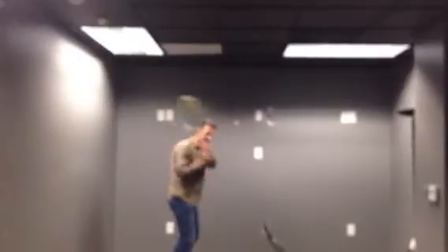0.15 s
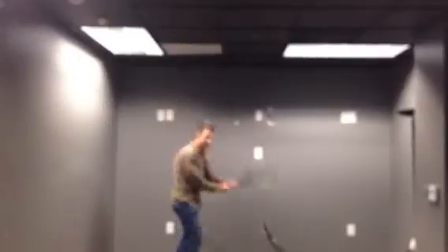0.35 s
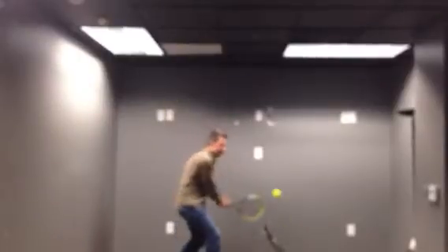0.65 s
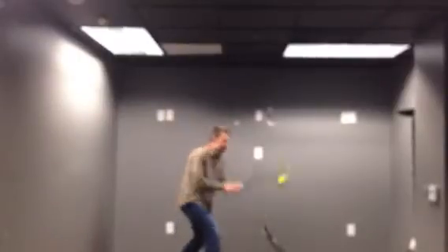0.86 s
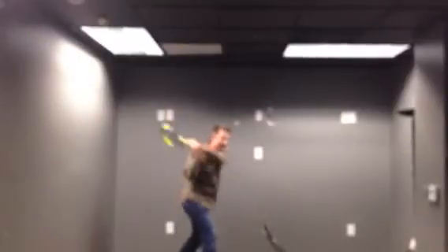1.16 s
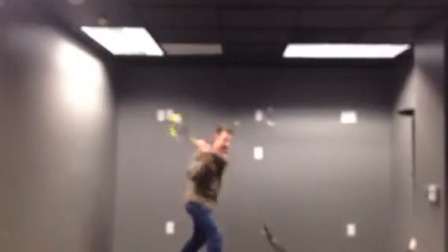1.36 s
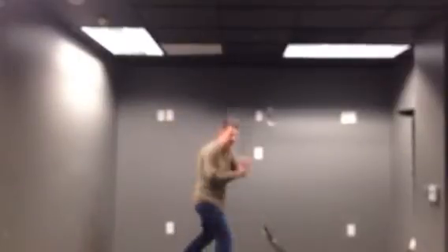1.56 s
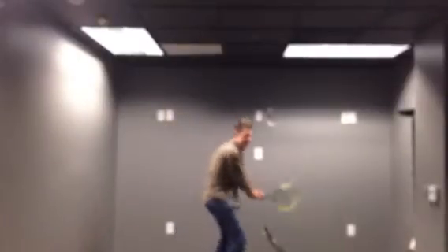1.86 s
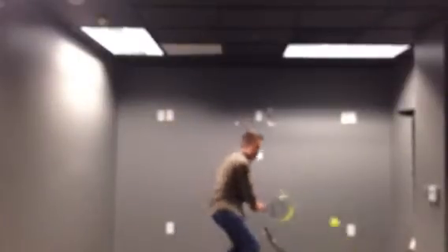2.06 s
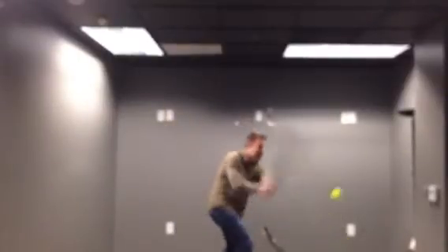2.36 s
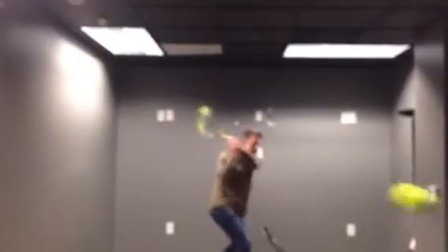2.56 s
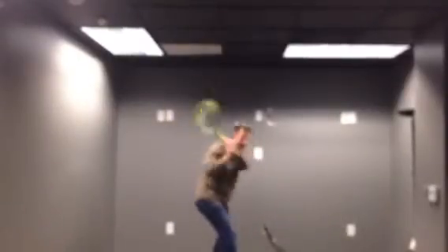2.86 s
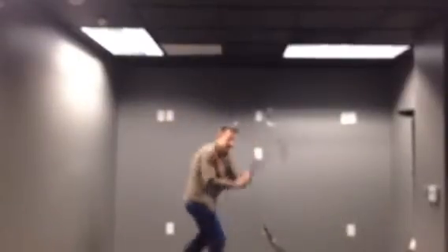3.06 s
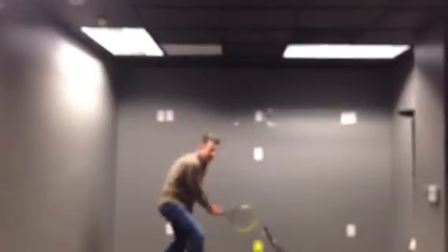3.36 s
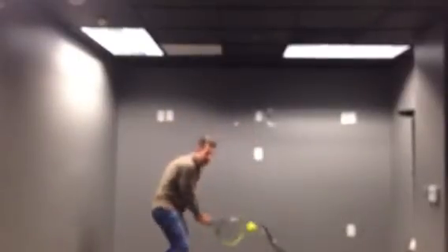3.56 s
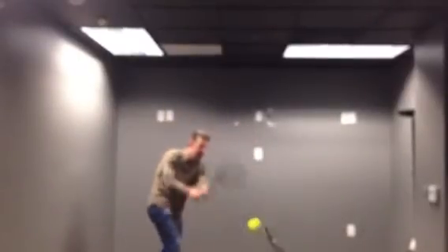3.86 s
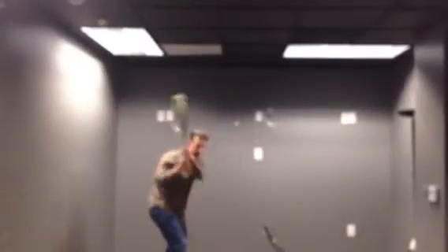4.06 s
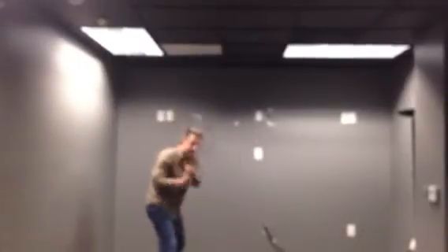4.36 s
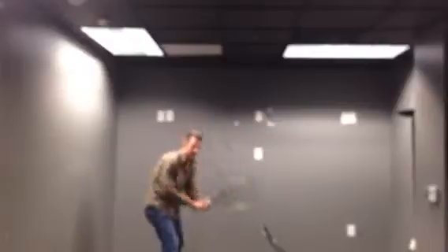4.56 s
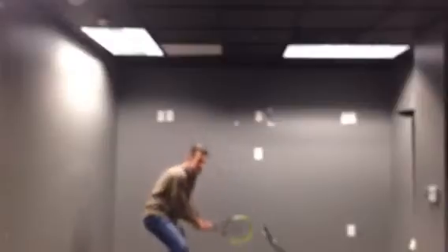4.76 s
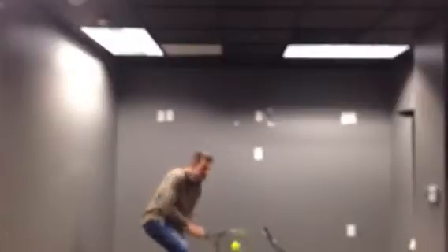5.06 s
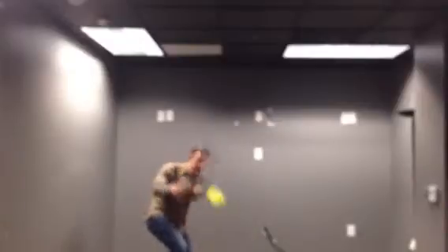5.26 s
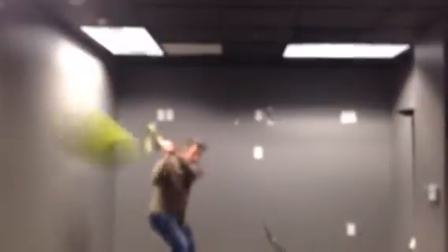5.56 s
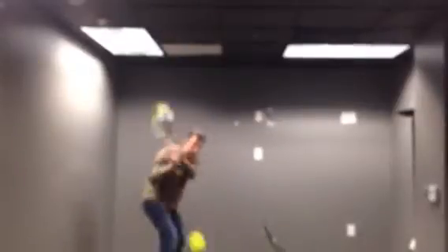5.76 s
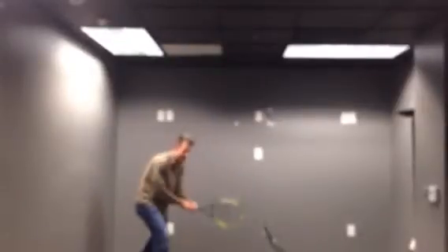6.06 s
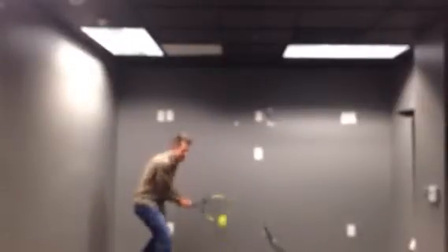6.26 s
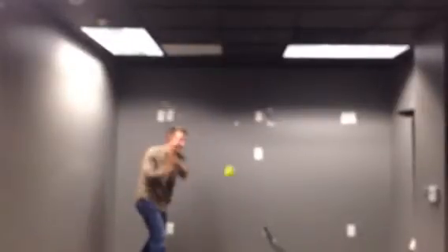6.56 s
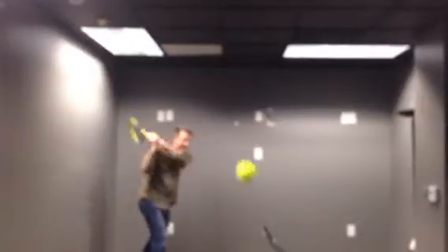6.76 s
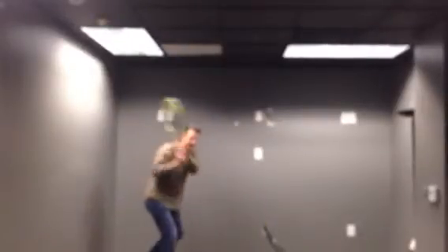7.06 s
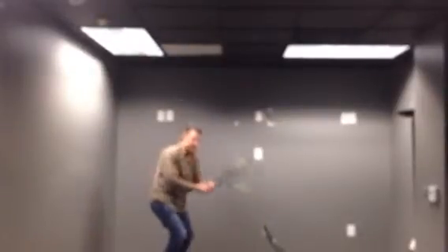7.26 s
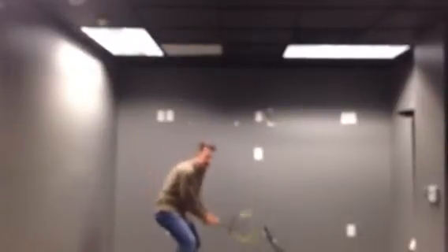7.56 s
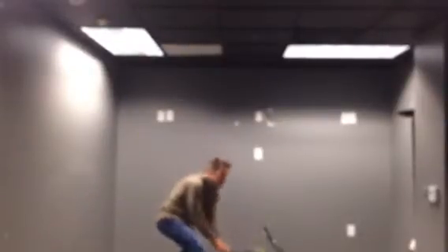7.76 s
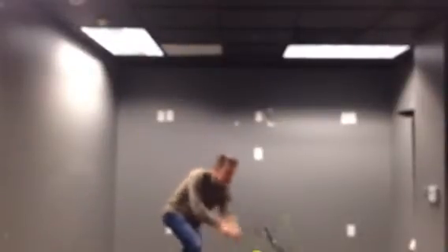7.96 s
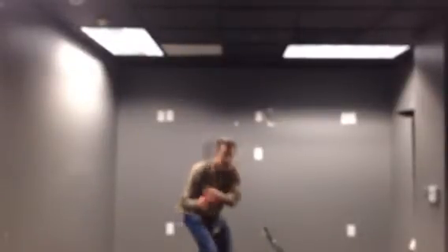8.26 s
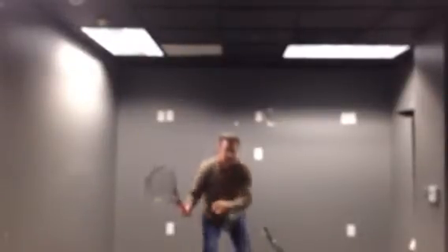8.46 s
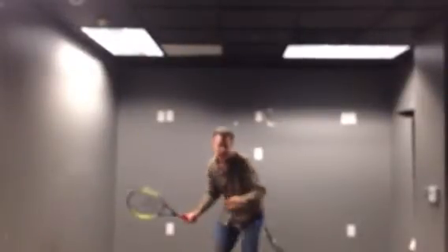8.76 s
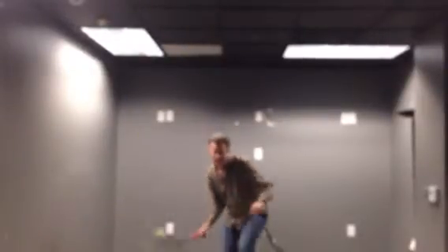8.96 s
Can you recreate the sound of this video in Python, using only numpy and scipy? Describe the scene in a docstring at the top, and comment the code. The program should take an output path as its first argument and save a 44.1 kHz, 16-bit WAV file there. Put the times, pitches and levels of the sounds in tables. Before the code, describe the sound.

One player hits a tennis ball against a hollow wall. Every 1.4 seconds or so a hard, booming slap dominates, followed by a muted floor thud and a woody racket knock with a short string ring. Echoes blur everything in the small room. Faint footsteps, sole scuffs, steady hum and hiss sit underneath, pumped by the distant microphone's gain control.

```python
"""The boom and echoes of a wall hit open the scene in a small bare room, over fan hum and hiss that never stop.
Then a tennis ball goes round: a dull hollow floor bounce, a racket knock with ringing strings, a wall slap.
Each contact is a short shaped pulse plus decaying noise echoes; decaying sines ring the wall, strings and ball.
Between them shoes thud as grainy bursts with room echoes and scuff as swelling noise.
The recorder's gain control ducks everything under the wall hits, then lets it rise again."""
import sys
import numpy as np
from scipy import signal
from scipy.fft import rfft, irfft
from scipy.io import wavfile

SR = 44100
rng = np.random.default_rng(int(sys.argv[2]) if len(sys.argv) > 2 else 0)


def wav_out(sig):
    """Save sig, one row per channel (or a flat mono array), as 16-bit PCM at SR to the path in sys.argv[1]."""
    wavfile.write(sys.argv[1], SR, np.round(np.clip(np.atleast_2d(sig).T, -1, 1) * 32767).astype(np.int16))


N = 402633
LEAD = 4410  # samples rendered ahead of the opening, so an earlier hit can ring into it
SPAN = 32768  # samples in an echo tail
RING_SIZE = 3 * SPAN // 2  # samples in a ring

# Levels are mix levels ahead of the recorder; spectra give relative density.
# Ball on wall, the first just before the opening: (time [s], slap [dB], panel boom [dB], deep boom [dB],
# note of the struck bay [Hz], bay level [dB], room note level [dB])
WALL_HITS = [(-0.077, -6, -11.5, -15.5, 166, -7, -34), (1.415, -5, -7, -8.5, 165.7, -9, -35),
             (2.813, -7, -13, -14, 109, -4.5, -35.5), (4.274, -4, -3, -10.5, 151, -4.5, -20.5),
             (5.604, -4, -21, -20.5, 159.8, -12.5, -43.5), (7.071, -5, -7, -10, 150.3, -5, -24),
             (8.458, -6.5, -0.5, -16, 152.3, 1, -35)]
# Ball on strings: (time [s], knock level [dB], string ring relative to knock [dB])
RACKET_STROKES = [(0.933, -27.5, -10.5), (2.347, -25.5, -12.5), (3.819, -23, -13.5), (5.207, -27, -16.5),
                  (6.511, -30, -9), (7.955, -24.5, -13.5)]
# Ball on floor: (time [s], level [dB])
FLOOR_BOUNCES = [(0.392, -23), (1.825, -21.5), (3.196, -24), (4.666, -20.5), (6.13, -24), (7.41, -23),
                 (8.824, -18)]
# Footfalls: (time [s], level [dB], brightness tilt [dB/octave])
FOOTFALLS = [(0.266, -46, 6), (0.731, -48.5, -4.5), (1.932, -48, -9), (2.034, -41, -6), (2.083, -53, -11),
             (3.626, -42.5, 0), (3.729, -47, 4.5), (7.306, -36, -6.5), (7.368, -35, -7.5)]
# Soles and cloth sliding: (time of the middle [s], level [dB], half length [s])
SCUFF_TIMES = [(3.004, -57.5, 0.069), (3.263, -67, 0.017), (5.892, -55, 0.096), (6.289, -60.5, 0.023),
               (7.333, -55.5, 0.05), (8.288, -62, 0.16), (8.579, -50, 0.048), (8.873, -50.5, 0.039)]

# Colour of the slap on the wall: (frequency [Hz], density [dB/Hz])
WALL_PUSH_COLOUR = [(18, -45), (30, -15.5), (225, 10), (1170, -24.5), (1640, -21.5), (2490, -19.5),
                    (3320, -12.5), (4910, -32.5), (5740, -48.5), (7260, -64.5), (8500, -68.5),
                    (15500, -57.5)]
# What the hard walls give back of a wall hit: (frequency [Hz], density [dB/Hz])
WALL_ECHO_COLOUR = [(180, -34), (300, -2), (417, -3), (769, -17), (1120, -11.5), (1810, -10), (2140, -13),
                    (2690, -22.5), (3280, -26), (7370, -45), (15500, -60)]
# Push of the whole wall on the air, heard as lumpy low echoes: (frequency [Hz], density [dB/Hz])
HEAVE_COLOUR = [(15, -17.5), (35, -6.5), (90, -3.5), (170, -1.5), (260, -12), (500, -29), (2000, -62)]
# Colour of the racket knock: (frequency [Hz], density [dB/Hz])
RACKET_PUSH_COLOUR = [(35, -60), (60, -16.5), (171, -1), (305, -3.5), (443, -14), (850, -13.5),
                      (1100, -7.5), (1790, -13.5), (2910, -26), (4630, -30), (10500, -37), (12500, -47),
                      (15500, -50.5)]
# Colour of the floor bounce: (frequency [Hz], density [dB/Hz])
BOUNCE_PUSH_COLOUR = [(35, -97), (60, -13.5), (107, -11), (183, 2.5), (253, -4), (312, 6.5), (486, 2.5),
                      (1960, -18.5), (2910, -31), (15500, -67.5)]
# Colour of a footfall: (frequency [Hz], density [dB/Hz])
STEP_PUSH_COLOUR = [(30, -20.5), (150, -8), (500, -7.5), (1500, -16.5), (4000, -41), (15000, -126)]
# Colour of the sliding hiss: (frequency [Hz], density [dB/Hz])
SCUFF_COLOUR = [(300, -1), (1500, 0), (4000, -11), (9000, -18.5), (15500, -25.5)]
# Colour of fan and microphone hiss: (frequency [Hz], density [dB/Hz])
AIR_COLOUR = [(15, -16.5), (25, -9.5), (55, -7.5), (107, -2.5), (198, -4.5), (433, -14), (997, -18.5),
              (1410, -11.5), (2230, -17.5), (2700, -21), (3930, -23.5), (14300, -29.5), (15500, -49.5)]
# Speed of the hum's level waver: (frequency [Hz], density [dB/Hz])
WAVER_COLOUR = [(1.5, 0), (4, -12), (12, -50), (40, -90)]

# Deep modes of the hollow wall: (frequency [Hz], level [dB], T60 [s])
DEEP_MODES = [(61, -6, 0.29), (96, 0.5, 0.27), (112.15, -5, 0.39)]
# Panel modes of the hollow wall: (frequency [Hz], level [dB], T60 [s])
PANEL_MODES = [(131, -18, 0.16), (154.7, -1.5, 0.38), (173.2, -4.5, 0.42), (200.7, 0, 0.34),
               (257, -6.5, 0.22), (290, -9, 0.13), (390.6, -13, 0.2)]
# Hollow ball squashed on the wall: (frequency [Hz], level [dB], T60 [s])
BALL_MODES = [(740, -6.5, 0.025), (1000, -5.5, 0.012), (1610, -6.5, 0.022), (2000, -3, 0.0045),
              (2790, -1, 0.021), (3247, -3, 0.0064), (4000, -12.5, 0.0052)]
# Two close standing waves of the room that beat: (frequency [Hz], level [dB], T60 [s])
ROOM_NOTE_MODES = [(189, -2.5, 1), (211.6, -1.5, 0.95)]
# String bed: (frequency [Hz], level [dB], T60 [s])
STRING_MODES = [(610, -7, 0.37), (764, -5, 0.057), (1106, -5.5, 0.35), (1443, -9, 0.35), (1777, -10, 0.43),
                (2350, -10.5, 0.17)]
# Hollow ball squashed on the floor: (frequency [Hz], level [dB], T60 [s])
HOLLOW_MODES = [(183.8, -6, 0.15), (318, -6.5, 0.081), (493, -1, 0.2), (637, -6.5, 0.12), (770, -11, 0.094),
                (1107, -10.5, 0.087)]
# Echo decay of the room: (frequency [Hz], T60 [s])
ROOM_DECAY = [(60, 0.36), (160, 0.67), (420, 0.25), (1100, 0.42), (2000, 0.48), (4000, 0.76), (8000, 0.14),
              (15000, 0.28)]

# Room: an early cluster on top of the tail; wall hits have a weaker cluster and a quicker echo rise
EARLY_DB, WALL_EARLY_DB, EARLY_T60_S = -1.5, -5.5, 0.49
ECHO_RISE_S, WALL_ECHO_RISE_S = 0.005, 0.0016

# Wall: a harder slap is brighter, and the echoes follow the panel boom
USUAL_SLAP_DB, SLAP_TILT_PER_DB = -5.5, 1.06
WALL_ECHO_DB, ECHO_FOLLOWS = 8, 0.48
BOOM_SWELL_S, SQUASH_S, BAY_T60_S = 0.018, 0.0012, 0.25
HEAVE_DB, BALL_DB = 2.5, -1  # relative to the deep boom, to the slap

# Racket (a harder stroke is brighter), floor and shoes
USUAL_STROKE_DB, STROKE_TILT_PER_DB, STRING_SWELL_S = -26, 0.35, 0.0018
STROKE_ECHO_DB, STRING_ECHO_DB, BOUNCE_ECHO_DB, STEP_ECHO_DB = 10, -6.5, -1, 4.5
HOLLOW_DB = -10.5  # relative to the bounce
CONTACT_S = 0.002  # time scale of the grainy burst

# Background
AIR_DB, HUM_HZ, HUM_DB, HUM_WAVER_DB = -65, 56, -64, 0.5

# Recorder
MIC_DIP_HZ, MIC_DIP_WIDTH_HZ, MIC_DIP_DEPTH = 2760, 420, 0.6
SENSE_HZ = 600  # the gain control listens above the bass
KNEE_DB, SQUEEZE = -27, 0.6  # SQUEEZE: dB of cut per dB over the knee
ATTACK_S, RELEASE_DB_S = 0.019, 68
HELD_AT_START_DB = -8.5  # level still held from the hit before the start
CEILING, CUTOFF_HZ = 0.72, 15480


def from_db(db):
    """Turn decibels into amplitude."""
    return 10 ** (np.asarray(db) / 20)


def at_hz(points, hz):
    """Read a table of values on a log-frequency axis."""
    point_hz, values = np.array(points).T
    return np.interp(np.log(np.maximum(hz, 1)), np.log(point_hz), values)


def soft_start(size, rise_s):
    """A smooth fade-in, for bodies and echoes that take a moment to speak."""
    t = np.arange(size) / SR
    return 1 - np.exp(-(t / rise_s) ** 2)


def push(spectrum, tilt_db):
    """A contact's push: the causal (minimum-phase) pulse of a tilted spectrum, height 1."""
    hz = np.fft.rfftfreq(SPAN, 1 / SR)
    octaves_from_1k = np.log2(np.maximum(hz, 50) / 1000)
    level_db = at_hz(spectrum, hz) + tilt_db * octaves_from_1k
    # folding the cepstrum forward packs the energy at the start
    cepstrum = irfft(level_db * np.log(10) / 20)
    cepstrum[1:SPAN // 2] *= 2
    cepstrum[SPAN // 2 + 1:] = 0
    pulse = irfft(np.exp(rfft(cepstrum)))[:SPAN // 8]
    return pulse / np.abs(pulse).max()


def crush(pulse):
    """The contact is a brief grainy burst of equal energy instead of one clean click."""
    t = np.arange(512) / SR / CONTACT_S
    grains = t * np.exp(-t) * (1 + 3.0 * rng.standard_normal(512))
    burst = signal.fftconvolve(pulse, grains)
    return burst * np.sqrt(np.sum(pulse ** 2) / np.sum(burst ** 2))


def ring(modes, spread_db):
    """One blow on a body: decaying sines, each with a random strength and sign."""
    t = np.arange(RING_SIZE) / SR
    hz, level_db, t60 = np.transpose(modes)[:, :, None]
    strength = from_db(level_db + spread_db * rng.standard_normal(hz.shape))
    strength = strength * rng.choice([-1, 1], hz.shape)
    decay = from_db(-60 * t / t60)
    return np.sum(strength * np.sin(2 * np.pi * hz * t) * decay, axis=0)


def echoes(early_db, rise_s):
    """Echo tail for one place in the room: noise dying band by band under an early cluster."""
    t = np.arange(SPAN) / SR
    hz = np.fft.rfftfreq(SPAN, 1 / SR)
    white = rfft(rng.standard_normal(SPAN))
    # ten octave bands that crossfade into each other
    centres = 45 * 2 ** np.arange(10.)
    octave = np.log2(np.maximum(hz, 45) / 45)
    weights = np.clip(1 - np.abs(octave - np.arange(10)[:, None]), 0, 1)
    bands = irfft(white * weights)
    decay = from_db(-60 * t / at_hz(ROOM_DECAY, centres)[:, None])
    tail = np.sum(bands * decay, axis=0)
    tail *= 1 + from_db(early_db - 60 * t / EARLY_T60_S)
    return tail * soft_start(SPAN, rise_s) / np.sqrt(SR / 40)


def contact(spectrum, level_db, tilt_db, echo_db):
    """A push heard directly and then from the walls."""
    pulse = push(spectrum, tilt_db)
    sound = from_db(echo_db) * signal.fftconvolve(pulse, echoes(EARLY_DB, ECHO_RISE_S))
    direct = crush(pulse)
    sound[:len(direct)] += direct
    return from_db(level_db) * sound


def coloured(spectrum, size):
    """Steady noise of a given spectrum, rms 1."""
    level_db = at_hz(spectrum, np.fft.rfftfreq(size, 1 / SR))
    noise = irfft(rfft(rng.standard_normal(size)) * from_db(level_db), size)
    return noise / noise.std()


def add(out, s, sound):
    """Mix a sound in at a time in seconds."""
    start = LEAD + round(s * SR)
    out[start:start + len(sound)] += sound[:len(out) - start]


def wall_hits():
    """The slap and the ball's own pock, with echoes and a hollow panel boom that swells up."""
    out = np.zeros(N + LEAD)
    swell = soft_start(RING_SIZE, BOOM_SWELL_S)
    squash = soft_start(RING_SIZE, SQUASH_S)  # the pock builds while the ball flattens
    for s, slap_db, boom_db, deep_db, bay_hz, bay_db, note_db in WALL_HITS:
        boom = from_db(deep_db) * ring(DEEP_MODES, spread_db=4.5)
        boom += from_db(boom_db) * ring(PANEL_MODES, spread_db=2.5)
        boom += ring([(bay_hz, bay_db, BAY_T60_S)], spread_db=0.5)
        boom += from_db(note_db) * ring(ROOM_NOTE_MODES, spread_db=4.0)
        slap = push(WALL_PUSH_COLOUR, SLAP_TILT_PER_DB * (slap_db - USUAL_SLAP_DB))
        path = echoes(WALL_EARLY_DB, WALL_ECHO_RISE_S)
        heave = signal.fftconvolve(push(HEAVE_COLOUR, 0), path)
        echo = signal.fftconvolve(push(WALL_ECHO_COLOUR, 0), path)
        echo_db = slap_db + WALL_ECHO_DB + ECHO_FOLLOWS * boom_db
        add(out, s - 0.007, swell * boom)  # the panel already yields while the ball flattens
        add(out, s, from_db(deep_db + HEAVE_DB) * heave)
        add(out, s, from_db(slap_db + 0.5) * crush(slap))
        add(out, s + 0.0021, from_db(slap_db + 1) * slap)  # the ball bottoms out
        add(out, s, from_db(slap_db + BALL_DB) * squash * ring(BALL_MODES, spread_db=5.5))
        add(out, s, from_db(echo_db) * echo)
    return out


def racket_strokes():
    """A bright knock excites the string bed, which rings on."""
    out = np.zeros(N + LEAD)
    swell = 1 - np.exp(-np.arange(RING_SIZE) / SR / STRING_SWELL_S)
    for s, level_db, ring_db in RACKET_STROKES:
        tilt_db = STROKE_TILT_PER_DB * (level_db - USUAL_STROKE_DB)
        add(out, s, contact(RACKET_PUSH_COLOUR, level_db, tilt_db, STROKE_ECHO_DB))
        strings = (swell * ring(STRING_MODES, spread_db=4.0))[:SPAN]
        strings = from_db(level_db + ring_db) * strings
        add(out, s, strings)
        blur = signal.fftconvolve(strings, echoes(EARLY_DB, ECHO_RISE_S))  # the walls blur the ring
        add(out, s, from_db(STRING_ECHO_DB) * blur)
    return out


def floor_bounces():
    """A dull thud with the hollow ball ringing briefly."""
    out = np.zeros(N + LEAD)
    for s, level_db in FLOOR_BOUNCES:
        add(out, s, contact(BOUNCE_PUSH_COLOUR, level_db, 0, BOUNCE_ECHO_DB))
        add(out, s + 0.0012, from_db(level_db + HOLLOW_DB) * ring(HOLLOW_MODES, spread_db=5.0))
    return out


def footfalls():
    """Shoe thuds: grainy bursts with room echoes and no ringing body."""
    out = np.zeros(N + LEAD)
    for s, level_db, tilt_db in FOOTFALLS:
        add(out, s, contact(STEP_PUSH_COLOUR, level_db, tilt_db, STEP_ECHO_DB))
    return out


def scuffs():
    """Friction hiss of sliding soles and cloth that swells and fades."""
    t = (np.arange(N + LEAD) - LEAD) / SR
    swell = sum(from_db(db) * np.exp(-((t - s) / half) ** 2) for s, db, half in SCUFF_TIMES)
    return swell * coloured(SCUFF_COLOUR, N + LEAD)


def fan_hum():
    """A fan's low sine whose level wavers slowly."""
    t = np.arange(N + LEAD) / SR
    level_db = HUM_DB + HUM_WAVER_DB * coloured(WAVER_COLOUR, N + LEAD)
    return from_db(level_db) * np.sin(2 * np.pi * HUM_HZ * t)


def air_hiss():
    """Broad steady noise of the fan and microphone."""
    return from_db(AIR_DB) * coloured(AIR_COLOUR, N + LEAD)


def scene():
    """Ball, player and room noise at the microphone."""
    ball = wall_hits() + racket_strokes() + floor_bounces()
    player = footfalls() + scuffs()
    background = fan_hum() + air_hiss()
    return (ball + player + background)[None, LEAD:]


def record(dry):
    """Microphone dip, gain control with quick attack and steady release, soft ceiling, top cut."""
    b, a = signal.iirpeak(MIC_DIP_HZ, MIC_DIP_HZ / MIC_DIP_WIDTH_HZ, SR)
    x = dry - MIC_DIP_DEPTH * signal.lfilter(b, a, dry)
    sensed = signal.lfilter(*signal.butter(1, SENSE_HZ, "high", fs=SR), x)
    sensed_db = 20 * np.log10(np.abs(sensed) + 1e-9)
    # peak hold that falls at a steady rate: a running maximum on a rising ramp, ramp then removed
    fall = RELEASE_DB_S * np.arange(N) / SR
    held_db = np.maximum.accumulate(sensed_db + fall, axis=1)
    held_db = np.maximum(held_db, HELD_AT_START_DB) - fall
    wanted_cut_db = SQUEEZE * np.maximum(held_db - KNEE_DB, 0)
    # smoothing sets how fast the cut bites; it starts already settled
    r = np.exp(-1 / (ATTACK_S * SR))
    cut_db = signal.lfilter([1 - r], [1, -r], wanted_cut_db, zi=r * wanted_cut_db[:, :1])[0]
    x = CEILING * np.tanh(x * from_db(-cut_db) / CEILING)
    top_cut = signal.cheby2(16, 50, CUTOFF_HZ, fs=SR, output="sos")
    return signal.sosfilt(top_cut, x)


dry = scene()
out = record(dry)
wav_out(out)
```